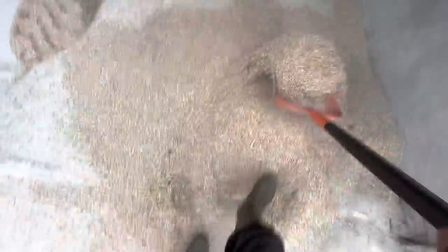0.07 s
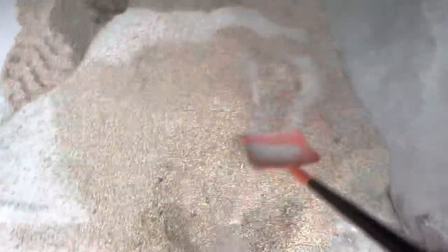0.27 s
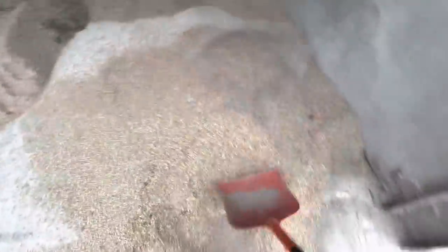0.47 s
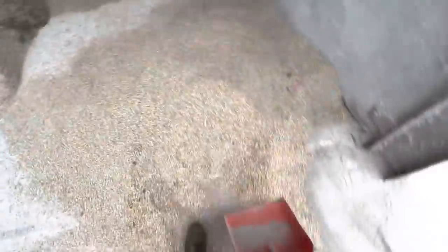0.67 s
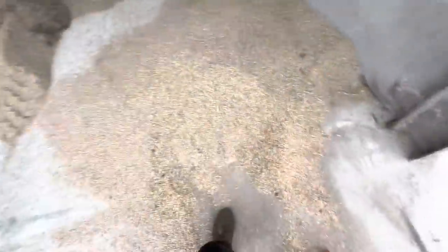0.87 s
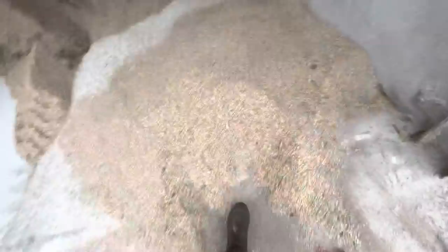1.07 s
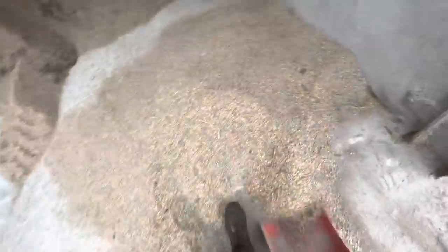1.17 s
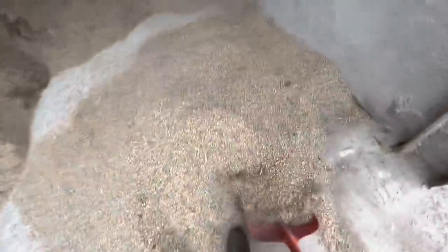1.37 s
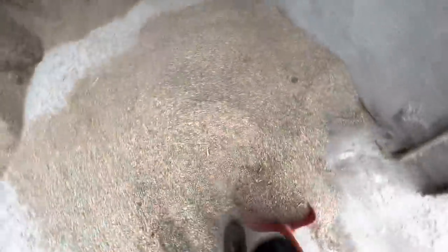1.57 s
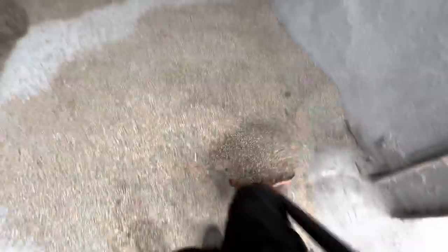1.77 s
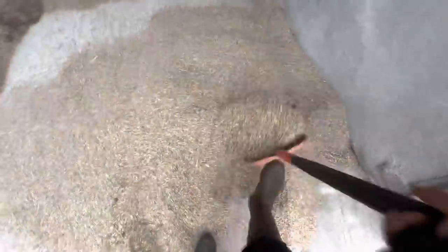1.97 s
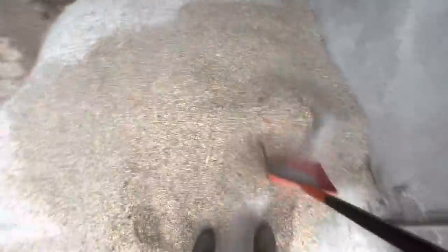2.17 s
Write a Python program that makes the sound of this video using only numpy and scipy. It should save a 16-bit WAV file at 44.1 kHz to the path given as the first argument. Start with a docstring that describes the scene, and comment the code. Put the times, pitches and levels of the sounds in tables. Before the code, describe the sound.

One hard, close scrape of a plastic shovel through loose feed on concrete is the main sound. Thrown feed patters softly until about 0.6 seconds. The shovel knocks down near 0.9, then judders from 1.0 to 1.3, crushing and spraying kernels. A dull tap comes at 1.4 and a boot thumps at 1.6, followed by soft shuffling and pattering until 2.2. A low rumble and faint barn echo lie underneath.

```python
"""A plastic scoop judders through loose feed on a concrete floor in one hard, close scrape.
Its edge sticks and slips, ringing the blade, crushing grit, cracking kernels and spraying feed.
The scoop knocks down just before the push; a boot thumps down after it. Thrown feed patters
at the start and the end, with soft shuffles, dull taps and a faint rub.
The barn walls answer faintly, and a low rumble lies under it all."""
import sys
import numpy as np
from scipy import signal
from scipy.fft import rfft, irfft, next_fast_len
from scipy.io import wavfile
from scipy.ndimage import map_coordinates

SR = 44100
rng = np.random.default_rng(int(sys.argv[2]) if len(sys.argv) > 2 else 0)


def store_wav(level_fs):
    """Save 16-bit WAV to argv[1]."""
    pcm = np.round(np.clip(np.atleast_2d(level_fs), -1, 1) * 32767)
    wavfile.write(sys.argv[1], SR, pcm.T.astype(np.int16))


N = 98122
T = np.arange(N) / SR

# edge catches and slips: t/s, ring/dB, crunch/dB
CATCHES = [(0.961, -26.5, -42), (0.993, -16, -42), (1.057, -12, -31), (1.087, -10.5, -31), (1.112, -9, -49),
           (1.142, -18, -22), (1.163, -12, -16.5), (1.204, -17, -29), (1.246, -16, -21.5)]
# resonances of the pressed blade and its stiff edge: f/Hz, width/Hz, level/dB
BLADE_RESONANCES = [(211, 64, -11), (426, 111, -0.5), (599, 165, -5), (800, 89, 0)]
EDGE_RESONANCES = [(1199, 118, 0), (1323, 180, -2), (1570, 130, -6)]
# envelopes of blade chatter, crushed grit, feed spray: t/s, relative level/dB
CHATTER_DB = [(0.96, -31.5), (0.985, -40.5), (1.005, -23.5), (1.165, -16), (1.268, -20), (1.36, -58)]
GRIT_DB = [(0.957, -46.5), (0.986, -48.5), (1.01, -36), (1.08, -28.5), (1.19, -21.5), (1.268, -28.5),
           (1.33, -54)]
SPRAY_DB = [(0.957, -53), (0.986, -50.5), (1.03, -32.5), (1.085, -25.5), (1.18, -25.5), (1.275, -40.5),
            (1.32, -62)]
# spectra of grit, spray, heap drag: f/Hz, level/dB
GRIT_TONE_DB = [(120, -26), (250, -15), (700, 3), (1500, 5), (2500, 1), (4000, -4.5), (6500, -4),
                (8000, -14.5), (12000, -40)]
SPRAY_TONE_DB = [(3000, -22), (7000, -7.5), (8400, 5.5), (9600, 4), (11000, -16), (15500, -15)]
DRAG_TONE_DB = [(90, -25.5), (205, 3), (320, -8.5), (1200, -32), (4000, -62)]
# stereo image of floor contacts: f/Hz, L-R coherence
CONTACT_COHERENCE = [(200, 0.98), (1000, 0.72), (2500, 0.2), (5000, 0.15), (14000, 0.79)]
def scrape():
    """The edge stalls, then slips: the blade rings, grit crushes, feed sprays, the heap drags."""
    stick_s, stick_db = 0.006, -7
    fill_start_s, fill_s = 1.105, 0.14
    stalls = sum(swell(s - stick_s / 2, stick_s, stick_s / 2, db=0) for s, _, _ in CATCHES)
    judder = amp(1.7 * wobble(150) + stick_db * stalls)
    modes = [(hz, db, np.log(1000) / (np.pi * width_hz))  # width to t60
             for hz, width_hz, db in BLADE_RESONANCES + EDGE_RESONANCES]
    slips = sum(amp(db) * ring(s, modes, attack_s=0.0017) for s, db, _ in CATCHES)
    crunches = sum(amp(db) * burst(s, t60_s=0.024, attack_s=0.0004) for s, _, db in CATCHES)
    push, crush = envelope(CHATTER_DB), envelope(GRIT_DB) * judder
    blade = shape(push * amp(-3.5) * judder * grains(2500, spread_db=2.5), resonances(BLADE_RESONANCES))
    edge = shape(crush * amp(3) * grains(2500, spread_db=5.5), resonances(EDGE_RESONANCES))
    grit = shape((crush * amp(4) + crunches) * grains(3500, spread_db=3.5), colour(GRIT_TONE_DB))
    kernels = grains(4000, spread_db=5)
    spray = shape(envelope(SPRAY_DB) * amp(1.5 + 2.3 * wobble(200)) * kernels, colour(SPRAY_TONE_DB))
    load = np.clip((T - fill_start_s) / fill_s, 0, 1)  # drag grows as the scoop fills
    drag = shape(push * load * amp(-12) * grains(800, spread_db=2), colour(DRAG_TONE_DB))
    return slips + stereo(blade + edge + grit + spray + drag, CONTACT_COHERENCE)


# scoop set down: t/s, ring/dB, crunch/dB
KNOCKS = [(.866, -35, -28), (.8715, -21.5, -28.5), (.878, -24.5, -31.5)]
# free scoop modes: f/Hz, level/dB, t60/s
SCOOP_MODES = [(354, 1, 0.092), (445, -4.5, 0.033), (566, -5.5, 0.033), (689, 2, 0.095),
               (802, -11.5, 0.075), (1410, -4, 0.036), (1550, -4, 0.039)]
# grating spectrum: f/Hz, level/dB
GRATE_TONE_DB = [(200, 6), (1500, 6), (2200, -0.5), (3000, 1.5), (4500, -16), (8400, -3), (15500, -28)]
def knocks():
    """The scoop rings and grates on kernels as it touches down."""
    body = sum(amp(db) * ring(s, SCOOP_MODES, attack_s=0.0015) for s, db, _ in KNOCKS)
    crush = sum(amp(db) * burst(s, t60_s=0.061, attack_s=0.00025) for s, _, db in KNOCKS)
    grate = shape(crush * grains(10000, spread_db=2), colour(GRATE_TONE_DB))
    return body + stereo(grate, CONTACT_COHERENCE)


# kernel snaps: t/s, level/dB
SNAPS = [(0.8868, -17), (0.954, -32), (0.9985, -22.5), (1.0299, -13), (1.088, -9.5), (1.19, -8.5),
         (1.279, -10.5)]
# snap spectrum: f/Hz, level/dB
SNAP_TONE_DB = [(500, 2), (3000, -4), (7000, -5), (8300, 9), (12000, -14)]
def snaps():
    """Single kernels crack under the edge."""
    bursts = sum(amp(db) * burst(s, t60_s=0.01, attack_s=0.00068) for s, db in SNAPS)
    cracks = shape(bursts * rng.standard_normal((2, N)), colour(SNAP_TONE_DB))
    return stereo(cracks, CONTACT_COHERENCE)


# boot landings, and the low thud of a light tap just before the scoop is set down:
# t/s, thud/dB, crunch/dB, thump/dB, thud pitch ratio
THUDS = [(0.564, -32.5, -71, -48, 0.71), (0.793, -31, -60, -63, 0.79), (1.589, -33, -63, -65, 0.97),
         (1.614, -12, -20.5, -55, 1), (1.622, -6.5, -21, -17, 1)]
# modes of the thud and the weight behind it: f/Hz, level/dB, t60/s
THUD_MODES = [(292, -5.5, 0.029), (382, 0, 0.03), (535, 1.5, 0.009), (700, 1, 0.014), (1038, -8, 0.015),
              (1660, -5.5, 0.026)]
WEIGHT_MODES = [(58.7, -14, 0.35), (88, -6, 0.093), (140, -5, 0.091), (211.6, -4.5, 0.12)]
# spectrum of crushed feed: f/Hz, level/dB
CRUNCH_TONE_DB = [(150, -4), (600, 1.5), (1800, 10), (2800, -2.5), (4700, 1), (7000, -4.5), (9000, -2),
                  (11500, -20)]
def thuds():
    """Boot landings and one light tap thud and crunch feed; a low thump follows each."""
    weight_lag_s = 0.0078
    thud = sum(amp(db) * ring(s, THUD_MODES, attack_s=0.0014, pitch=pitch)
               for s, db, _, _, pitch in THUDS)
    crush = sum(amp(db) * burst(s, t60_s=0.071, attack_s=0.00011) for s, _, db, _, _ in THUDS)
    thump = sum(amp(db) * ring(s + weight_lag_s, WEIGHT_MODES, attack_s=0.0049)
                for s, _, _, db, _ in THUDS)
    crunch = shape(crush * grains(7000, spread_db=3.5), colour(CRUNCH_TONE_DB))
    return thud + thump + stereo(crunch, CONTACT_COHERENCE)


# falling feed: t/s, relative level/dB
PATTER_DB = [(0, -42), (.2, -46.5), (.29, -41.5), (.34, -46), (.52, -46), (.71, -61), (.94, -68),
             (1.33, -57), (1.45, -50.5), (1.51, -60.5), (1.6, -58.5), (1.65, -47), (1.75, -47), (1.81, -52),
             (1.86, -46.5), (1.92, -50.5), (2.08, -42.5), (2.22, -43)]
# shuffles in the heap: peak t/s, rise/s, fall/s, level/dB
SHUFFLES = [(0.791, 0.034, 0.05, -43.5), (1.35, 0.06, 0.081, -45), (1.73, 0.086, 0.057, -37),
            (1.84, 0.047, 0.05, -50)]
# patter and shuffle spectra: f/Hz, level/dB
PATTER_TONE_DB = [(200, -8), (600, -3), (1400, 2.5), (7000, 1), (8500, 8.5), (10300, -1.5), (12000, -5.5),
                  (15500, -1.5)]
SHUFFLE_TONE_DB = [(80, -21), (300, 9), (650, -2.5), (1200, 1.5), (1800, -2), (2800, -14), (6000, -11.5),
                   (15000, -58)]
# stereo image of the feed: f/Hz, L-R coherence
FEED_COHERENCE = [(400, 0.4), (4000, 0.19)]
def feed():
    """Kernels patter down; the stirred heap rustles more dully."""
    flow = envelope(PATTER_DB) * amp(3 + 0.54 * wobble(41.5))
    patter = shape(flow * grains(9000, spread_db=1.5), colour(PATTER_TONE_DB))
    stir = sum(swell(*row) for row in SHUFFLES) * amp(1.4 * wobble(80))
    rustle = shape(stir * grains(3000, spread_db=4.5), colour(SHUFFLE_TONE_DB))
    return stereo(patter + rustle, FEED_COHERENCE)


# light taps: t/s, level/dB, pitch ratio, left boost and right cut/dB
TAPS = [(.7922, -26.5, 1.2, 1.5), (.804, -34, 1.2, 4), (1.4395, -22.5, 0.983, 7.5)]
# tap modes: f/Hz, level/dB, t60/s
TAP_MODES = [(665, -2.5, 0.014), (1040, 0, 0.013), (1890, -3, 0.0085)]
def taps():
    """Short dull taps, to the left."""
    return sum(amp(db) * ring(s, TAP_MODES, attack_s=0.00066, pitch=pitch) * amp([[pan_db], [-pan_db]])
               for s, db, pitch, pan_db in TAPS)


def rub():
    """A faint hoarse rub of falling pitch."""
    peak_s, centre_hz, glide_hz_per_s, jitter_hz = 1.872, 1020, -6000, 90
    hz = centre_hz + glide_hz_per_s * (T - peak_s) + jitter_hz * wobble(350)
    return swell(peak_s, rise_s=0.028, fall_s=0.015, db=-43.5) * np.sin(2 * np.pi * np.cumsum(hz) / SR)


def barn(x):
    """The walls return a faint, dull tail."""
    t60_s, wet_db = 0.16, -15.5
    t = T[:SR // 2]
    tail = rng.standard_normal((2, len(t))) * amp(-60 * t / t60_s)
    wet = signal.fftconvolve(x, tail / np.linalg.norm(tail[0]), axes=1)[:, :N]
    return amp(wet_db) * filtered(wet, colour([(300, 8.5), (1500, 6), (8000, 0.5)]))


# rumble envelope: t/s, level/dB
RUMBLE_DB = [(0, -48.5), (.4, -47), (.5, -44), (2.22, -44)]
# rumble spectrum: f/Hz, level/dB
RUMBLE_TONE_DB = [(25, -33), (44, 1.5), (60, 1.5), (105, -5), (220, -14), (800, -22), (1600, -23),
                  (15000, -66)]
# stereo image of the rumble: f/Hz, L-R coherence
RUMBLE_COHERENCE = [(60, 0.94), (200, 0.64), (400, 0.44), (900, 0)]
def rumble():
    """Low background of the farm."""
    noise = shape(rng.standard_normal((2, N)), colour(RUMBLE_TONE_DB))
    return envelope(RUMBLE_DB) * stereo(noise, RUMBLE_COHERENCE)


def amp(db):
    """dB to gain."""
    return 10 ** (np.asarray(db) / 20)


def along(points, hz):
    """Interpolate (f/Hz, value) points on a log axis."""
    f, values = np.transpose(points)
    return np.interp(np.log(hz + 1), np.log(f + 1), values)


def envelope(rows):
    """Gain from (t/s, level/dB) rows, fading out beyond both ends."""
    s, db = np.transpose(rows)
    s = np.r_[s[0] - 0.04, s, s[-1] + 0.04]
    db = np.r_[db[0] - 30, db, db[-1] - 30]
    return amp(np.interp(T, s, db, left=-120, right=-120))


def swell(peak_s, rise_s, fall_s, db):
    """Gaussian rise and fall."""
    return amp(db) * np.exp(-((T - peak_s) / np.where(T < peak_s, rise_s, fall_s)) ** 2)


def burst(start_s, t60_s, attack_s):
    """Exponential attack and decay."""
    t = np.maximum(T - start_s, 0)
    return amp(-60 * t / t60_s) * (1 - np.exp(-t / attack_s))


def ring(start_s, modes, attack_s, pitch=1):
    """Struck damped modes of alternating sign; levels vary by about 1 dB a strike."""
    return sum((-1) ** k * amp(db + rng.normal(0, 1)) * burst(start_s, t60_s, attack_s)
               * np.sin(2 * np.pi * hz * pitch * (T - start_s))
               for k, (hz, db, t60_s) in enumerate(modes))


def wobble(knots_per_s):
    """Smooth random curve."""
    return map_coordinates(rng.standard_normal(2000), [T * knots_per_s], mode="wrap")


def grains(hits_per_s, spread_db):
    """Two streams of tiny random impacts, rms 1."""
    hits = rng.random((2, N)) < hits_per_s / SR
    signs = rng.choice([-1, 1], (2, N))
    sizes = amp(spread_db * np.clip(rng.standard_normal((2, N)), -2, 2))
    impacts = hits * signs * sizes
    return impacts / np.sqrt(np.mean(impacts ** 2) + 1e-20)


def filtered(x, response):
    """Apply a complex frequency response."""
    size = 2 * next_fast_len(N * 3 // 4)
    return irfft(rfft(x, size) * response(np.fft.rfftfreq(size, 1 / SR)), size)[..., :N]


def shape(x, response):
    """Filter at unit power gain for white noise."""
    return filtered(x, lambda hz: response(hz) / np.sqrt(np.mean(abs(response(hz)) ** 2)))


def colour(tone_db):
    """Minimum-phase response from (f/Hz, level/dB) points."""
    def response(hz):
        cepstrum = irfft(np.log(amp(along(tone_db, hz))))
        half = len(cepstrum) // 2
        cepstrum[1:half] *= 2
        cepstrum[half + 1:] = 0
        return np.exp(rfft(cepstrum))
    return response


def resonances(rows):
    """Parallel band-passes of alternating sign from (f/Hz, width/Hz, level/dB) rows."""
    return lambda hz: sum((-1) ** k * amp(db) * 1j * hz * width / (f * f - hz * hz + 1j * hz * width)
                          for k, (f, width, db) in enumerate(rows))


def stereo(pair, coherence):
    """Mix two independent streams to left and right at the given coherence."""
    def weights(hz):
        angle = np.arccos(np.clip(along(coherence, hz), -1, 1)) / 2
        return np.array([np.cos(angle), np.sin(angle)])
    mid, side = filtered(pair, weights)
    return np.array([mid + side, mid - side])


# level between microphone ports: f/Hz, L minus R/dB
PORT_BALANCE_DB = [(160, 2), (450, -5), (740, -5.5), (1220, 1.5), (1700, 6), (2600, -1), (5400, 8.5),
                   (7000, 5), (8100, 6), (9600, -2.5), (11500, 0.5)]
# phase between ports: f/Hz, left lead/rad
PORT_PHASE_RAD = [(0, 0.5), (250, -0.43), (850, -.5), (2300, -3), (3200, -6), (7000, -7), (12000, -17),
                  (14500, -25.5)]
def ports(hz):
    """Left and right response; close sound reaches the right port first."""
    split = np.array([[0.5], [-0.5]])
    phase_rad = np.interp(hz, *np.transpose(PORT_PHASE_RAD))
    return amp(along(PORT_BALANCE_DB, hz) * split) * np.exp(1j * phase_rad * split)


def scene():
    """Close sources, wall reflections and rumble."""
    close = scrape() + knocks() + thuds() + snaps() + feed() + rub()
    direct = filtered(close, ports) + taps()
    return direct + barn(direct) + rumble()


# microphone housing notches: f/Hz, width/Hz, depth 0-1
HOUSING_NOTCHES = [(5410, 114, 0.66), (7550, 260, 0.65)]
def record(dry):
    """The microphone housing cuts two narrow notches; the top is band-limited."""
    top_hz = 16000
    def response(hz):
        notches = [1 - depth * np.exp(-((hz - f) / width) ** 2) for f, width, depth in HOUSING_NOTCHES]
        return np.prod(notches, axis=0) * (hz < top_hz)
    return filtered(dry, response)


dry = scene()
out = record(dry)
store_wav(out)
```